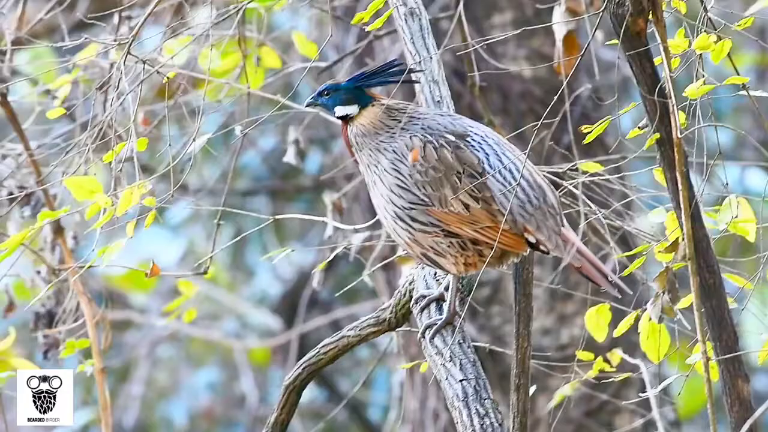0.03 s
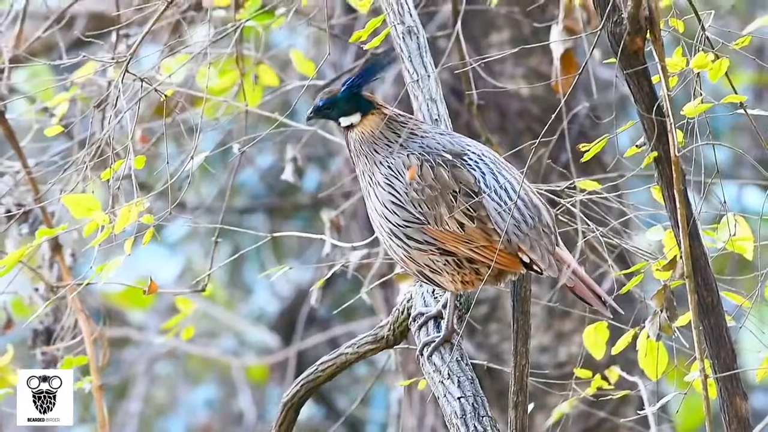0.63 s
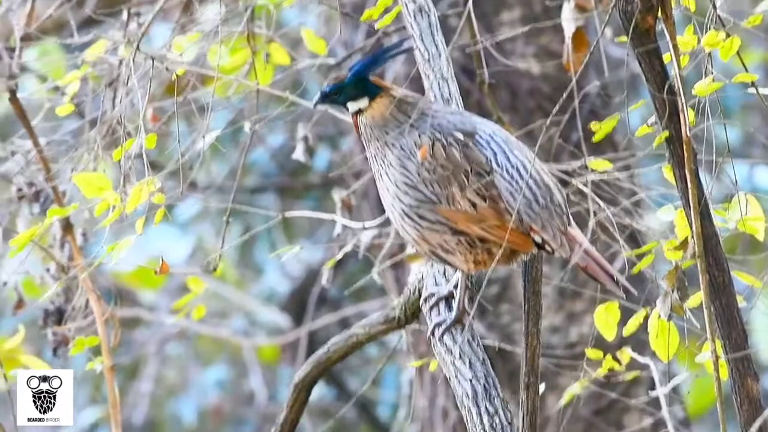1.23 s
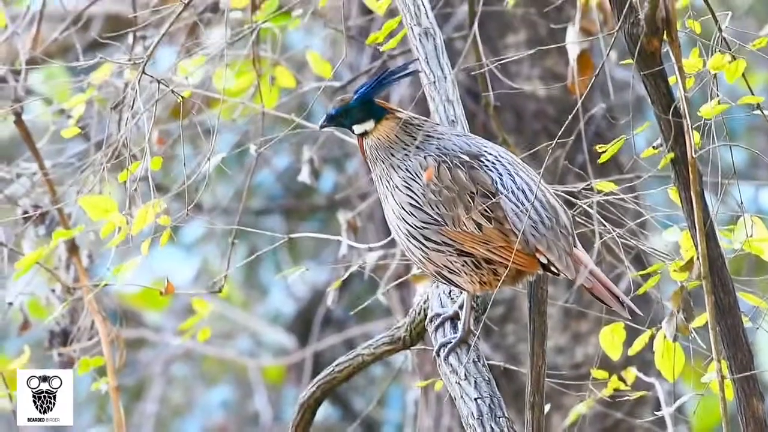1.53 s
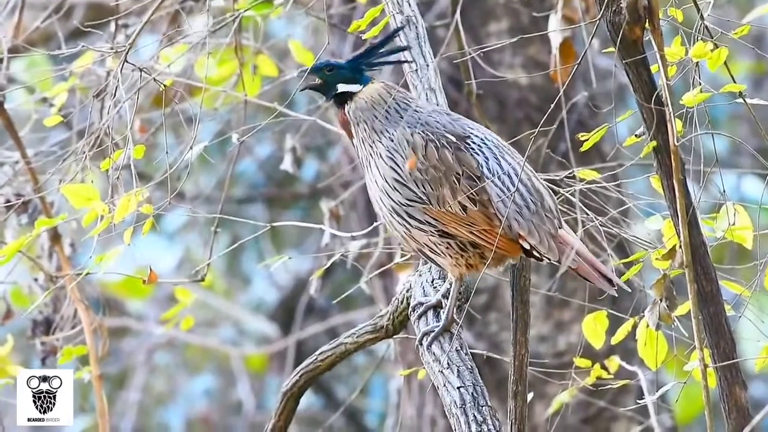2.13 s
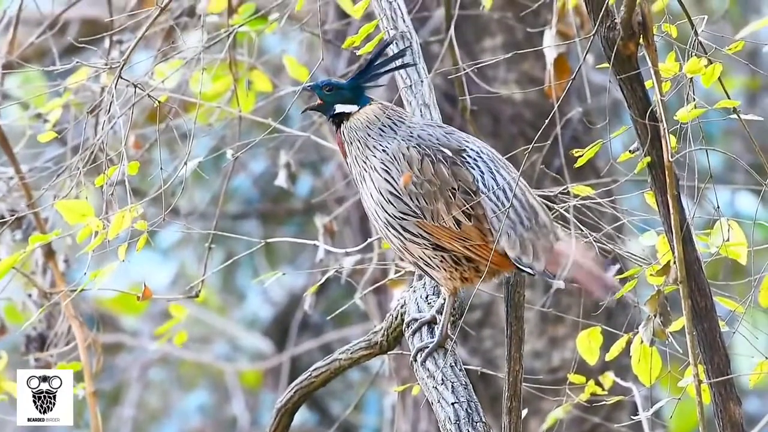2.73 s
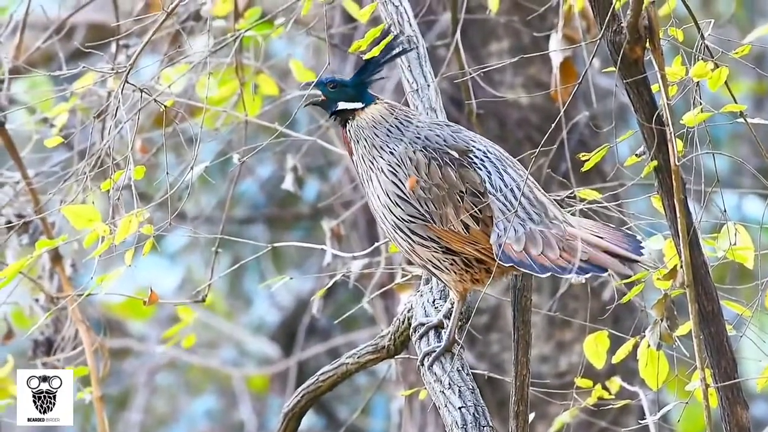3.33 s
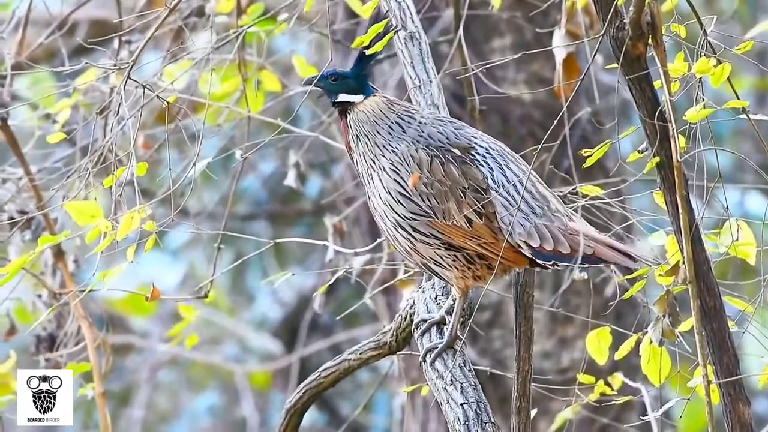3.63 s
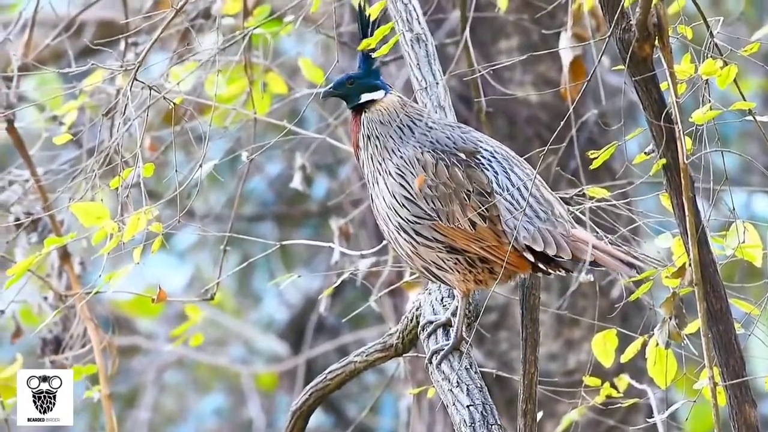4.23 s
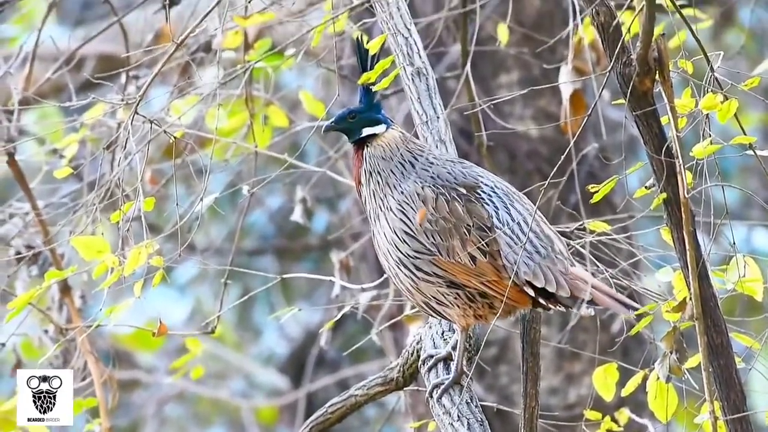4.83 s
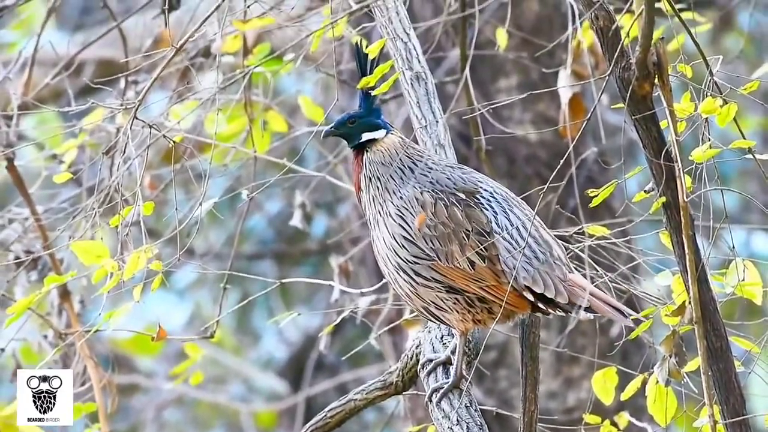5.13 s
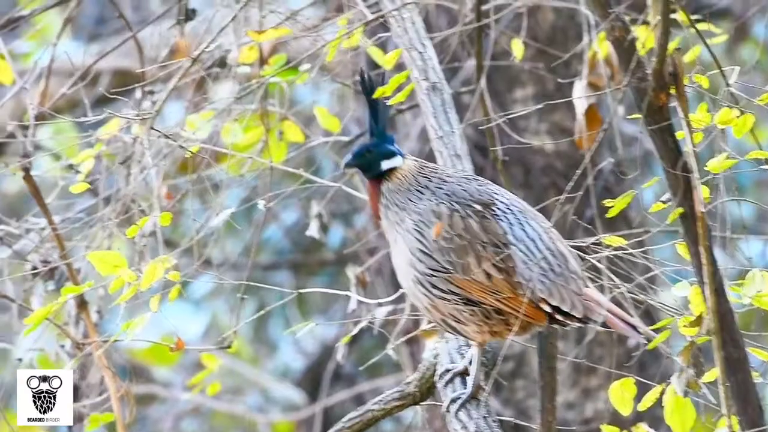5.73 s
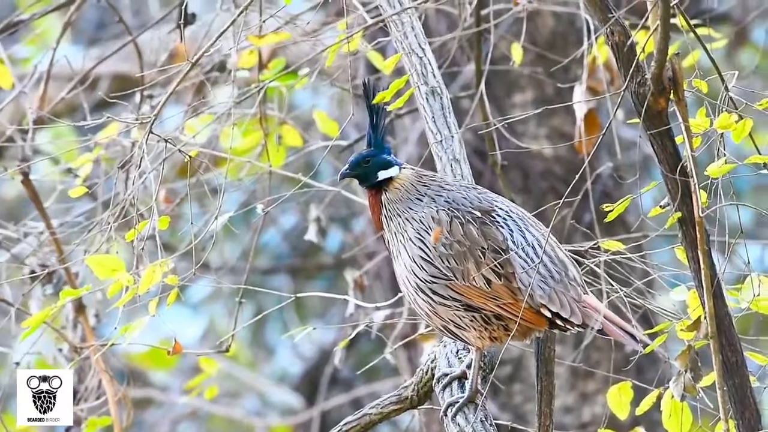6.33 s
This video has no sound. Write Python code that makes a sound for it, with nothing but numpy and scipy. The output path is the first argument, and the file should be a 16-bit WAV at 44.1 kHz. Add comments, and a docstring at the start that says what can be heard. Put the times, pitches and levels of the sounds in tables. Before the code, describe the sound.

In a forest, a nearby camera clicks five times, its focus motor whirring briefly after the first shot. A pheasant then crows loudly in five harsh syllables, a throaty rattle around a hoarse whistle, with a long, soft echo. Two more pairs of shutter clicks follow. Bird and camera sit almost entirely on the right, over quiet hiss and a low rumble.

```python
"""A pheasant on a forest branch crows five harsh syllables: an uneven throat rattle around a hoarse whistle.
Twigs scatter the calls and trunks return them as a long, soft echo. A nearby camera fires nine times,
each shot the same six strokes of mirror and curtains, and its focus motor whirrs once.
Quiet hiss and low rumble lie underneath. The microphone feeds the right channel and leaks
only faintly into the left."""
import sys
import numpy as np
from scipy import signal
from scipy.fft import rfft, irfft, next_fast_len
from scipy.io import wavfile
from scipy.ndimage import uniform_filter1d, map_coordinates

SR = 44100
rng = np.random.default_rng(int(sys.argv[2]) if len(sys.argv) > 2 else 0)


def store_pcm(level_fs):
    """Save levels as 16-bit WAV."""
    pcm = np.round(np.clip(level_fs, -1, 1) * 32767).astype(np.int16)
    wavfile.write(sys.argv[1], SR, np.atleast_2d(pcm).T)


N = 285768
SPIN_UP_S, SPIN_DOWN_S = 0.02, 0.052  # both camera motors start quickly and run out slowly


def amp(db):
    """Decibels to gain."""
    return 10 ** (np.asarray(db) / 20)


def unit(x):
    """Scale to rms 1."""
    return x / np.sqrt(np.mean(x ** 2) + 1e-20)


def along(points, hz):
    """Read a curve of (Hz, value) points on a log frequency axis."""
    point_hz, values = np.transpose(points)
    return np.interp(np.log(hz + 1), np.log(point_hz + 1), values)


def wobble(rate, size):
    """A smooth random curve with `rate` knots a second."""
    knots = rng.standard_normal(int(size * rate / SR) + 4)
    return map_coordinates(knots, [np.arange(size) * rate / SR])


def coloured(x, spectrum):
    """Minimum-phase EQ through (Hz, dB) points."""
    m = 2 * next_fast_len(len(x))
    cepstrum = irfft(np.log(amp(along(spectrum, np.fft.rfftfreq(m, 1 / SR)))))
    cepstrum[1:m // 2] *= 2
    cepstrum[m // 2 + 1:] = 0
    return irfft(rfft(x, m) * np.exp(rfft(cepstrum)))[:len(x)]


def resonance(x, centre_hz, width_hz):
    """One ringing mode with gain 1 at its centre."""
    return signal.lfilter(*signal.iirpeak(centre_hz, centre_hz / width_hz, SR), x)


def gate(t, length_s, attack_s, release_s):
    """Attack, hold and release between 0 and length_s."""
    return np.clip(t / attack_s, 0, 1) * np.clip((length_s - t) / release_s, 0, 1)


def add(track, start_s, sound):
    """Mix a sound into a track."""
    part = track[max(round(start_s * SR), 0):][:len(sound)]
    part += sound[:len(part)]


def noise(spectrum):
    """Steady coloured noise of rms 1."""
    return unit(coloured(rng.standard_normal(N), spectrum))


def noise_bed():
    """Each channel has its own quiet hiss; a low rumble sits on the left."""
    # hiss colour: freq_hz, gain_db
    hiss_eq = [(25, -6), (100, 0), (250, -1.5), (500, -4.5), (1000, -7), (2000, -11.5), (5000, -16.5),
               (10000, -21), (15500, -29)]
    # rumble colour: freq_hz, gain_db
    rumble_eq = [(15, -5), (30, -2.5), (80, 0), (130, -3.5), (200, -7), (400, -13.5), (800, -21.5),
                 (2000, -54.5)]
    left = amp(-59.5) * noise(hiss_eq) + amp(-51) * noise(rumble_eq)
    right = amp(-57) * noise(hiss_eq)
    return np.array([left, right])


def stroke(t, rise_s, t60_s, bounce_db, bounce_s=0.0095):
    """Envelope of a part that hits its stop at t = 0, rattles out and bounces once."""
    def hit(age):
        return np.clip(age / rise_s, 0, 1) * amp(-60 * np.maximum(age - rise_s, 0) / t60_s)
    return np.hypot(hit(t), amp(bounce_db) * hit(t - bounce_s))


def shutter():
    """Mirror and curtains knock the body and tick the blades; each release adds a ringing thump."""
    # shutter releases: release_s, level_db
    shots = [(0.2268, -31), (0.5604, -31), (0.894, -31), (1.227, -31), (1.776, -31), (3.7496, -31),
             (4.0839, -31.5), (5.3188, -31.5), (5.6545, -31)]
    # mirror up, curtain set, latch, release, second curtain, mirror down:
    # offset_s, knock_db, tick_db, bounce_db, rise_s
    strokes = [(-.102, -2, -2, -4.5, 0.0062), (-.0665, -2, -12, -5.5, 0.0021),
               (-.006, -6.5, -13, -10, 0.0022), (-.0005, 2, -4, -14, .0015), (0.023, -0.5, -7.5, -14, .002),
               (0.043, -1.5, -4.5, -5.5, .0025)]
    # camera body modes: centre_hz, width_hz, gain_db
    body_modes = [(1156, 115, 2.5), (1462, 183, 0.5), (2100, 240, -1), (2720, 180, -4.5), (2970, 210, -4.5),
                  (3790, 240, -4), (4390, 310, -9.5), (5090, 170, -6.5), (5750, 120, -20)]
    # colour of the metal blades: freq_hz, gain_db
    blade_eq = [(1000, -5), (3000, -3), (4000, -9.5), (6000, -1), (7000, -6), (8000, -10.5), (11000, -9),
                (13500, -12), (15500, -18)]
    # what the release sets ringing: pitch_hz, level_db, t60_s
    thump_modes = [(1276, 7, 0.014), (1950, -9, 0.0099), (3040, -1.5, 0.012)]
    knock_t60_s, tick_t60_s = 0.074, 0.019  # the thin blades die faster than the body
    t = np.arange(-SR // 5, SR // 5) / SR  # zero at the release
    knock_power = tick_power = 0
    for offset_s, knock_db, tick_db, bounce_db, rise_s in strokes:
        age = t - offset_s
        slide = amp(-14.5) * np.exp(-np.abs(age) / 0.0067)  # the part slides audibly into its hit
        knock_power += (amp(knock_db + 1.5) * stroke(age, rise_s, knock_t60_s, bounce_db)) ** 2
        tick_power += amp(tick_db - 1) ** 2 * (stroke(age, rise_s, tick_t60_s, bounce_db) ** 2 + slide ** 2)
    # the drive runs from just before the release until the mirror is back
    gears = amp(-18) * gate(t + 0.022, 0.079, SPIN_UP_S, SPIN_DOWN_S)
    tick_power += gears ** 2
    tail = t[t >= 0]
    ring = sum(amp(db - 60 * tail / t60) * np.sin(2 * np.pi * hz * tail) for hz, db, t60 in thump_modes)
    thump = ring * (1 - np.exp(-tail / 0.0011))
    knocks, ticks, thumps = np.zeros((3, N))
    for release_s, db in shots:
        add(knocks, release_s + t[0], amp(db) * np.sqrt(knock_power) * rng.standard_normal(len(t)))
        add(ticks, release_s + t[0], amp(db) * np.sqrt(tick_power) * rng.standard_normal(len(t)))
        add(thumps, release_s, amp(db) * thump)
    body = sum((-1) ** k * amp(db) * resonance(knocks, hz, width_hz)
               for k, (hz, width_hz, db) in enumerate(body_modes))
    return body + coloured(ticks, blade_eq) + thumps


def forest(x, near_db, near_t60_s, far_db):
    """Nearby twigs scatter the treble at once; distant trunks add a long, dull tail."""
    # decay among the trunks: freq_hz, t60_s
    trunk_decay = [(500, 1), (1400, 1.58), (2200, 1.5), (4000, 1.7), (8000, 1.32), (15000, 0.16)]
    # colour of the twig scatter: freq_hz, gain_db
    twig_eq = [(600, 0), (1600, -4.5), (4000, 6), (7000, 5), (10000, 5), (15000, 13)]
    hz, t, bands = signal.stft(rng.standard_normal(3 * SR // 2), SR, nperseg=256)
    decay = amp(-60 * t / along(trunk_decay, hz)[:, None])
    far = signal.istft(bands * decay * (1 - np.exp(-t / 0.0079)), SR, nperseg=256)[1]
    t = np.arange(SR // 2) / SR
    spikes = rng.standard_normal(len(t)) ** 3
    near = spikes * amp(-60 * t / near_t60_s) * (1 - np.exp(-t / 0.0035))
    echo = amp(far_db) * far / np.linalg.norm(far)
    add(echo, 0, amp(near_db) * coloured(near / np.linalg.norm(near), twig_eq))
    return x + signal.fftconvolve(x, echo)[:N]


def focus_motor(start_s=0.402, length_s=0.16):
    """The lens motor whirrs briefly before the second shot."""
    # whirr colour: freq_hz, gain_db
    motor_eq = [(600, -33), (1500, -2), (5000, -2), (8000, -6), (13000, -12), (15500, -15)]
    spin = gate(np.arange(N) / SR - start_s, length_s, SPIN_UP_S, SPIN_DOWN_S)
    return amp(-54.5) * spin * noise(motor_eq)


def syrinx(rate_hz, jitter, scatter_db, turbulence):
    """Membranes slap unevenly, each opening letting out a puff of air. Returns sound and airflow."""
    n = len(rate_hz)
    cycles = np.cumsum(rate_hz * np.exp(jitter * wobble(300, n))) / SR
    slaps = np.diff(np.floor(cycles), prepend=-1) * amp(scatter_db * rng.standard_normal(n))
    flow = 1 + 0.5 * np.cos(2 * np.pi * cycles - 1)  # swells just after each slap
    puffs = unit(flow * rng.standard_normal(n))
    return unit(unit(slaps) + turbulence * puffs), flow


def saturated(x, ceiling):
    """The swing of the membranes is limited, which evens out the strongest slaps."""
    swing = uniform_filter1d(np.abs(signal.hilbert(unit(x))), size=60)
    return unit(x / (1 + (swing / ceiling) ** 4) ** 0.25)


def whistle(centre_hz, swell_db, opening, flow, hz_per_db=3, hz_per_opening=168):
    """A hoarse tone that pulses with the airflow and rises with pressure and as the beak opens."""
    pitch_hz = centre_hz + hz_per_db * swell_db + hz_per_opening * (opening - opening.mean())
    hoarse_hz = pitch_hz * (1 + 0.037 * wobble(600, len(flow)))
    return unit(flow * np.sin(2 * np.pi * np.cumsum(hoarse_hz) / SR))


def windpipe(flow, centre_hz=4050, width_hz=400):
    """Breath excites the upper resonance of the windpipe: a nasal edge."""
    breath = flow * rng.standard_normal(len(flow))
    return unit(resonance(resonance(breath, centre_hz, width_hz), centre_hz, width_hz))


def syllable(length_s, full_db, swell_s, whistle_hz, whistle_db, first_opening, last_opening):
    """One push of air swells and eases. An open beak makes the rattle faster and brighter."""
    # throat colour, beak nearly shut: freq_hz, gain_db
    shut_eq = [(200, -37.5), (520, -22.5), (720, -15), (1000, -6.5), (1230, 2), (1550, 1), (1800, -10),
               (2400, -24.5), (3300, -27), (4000, -18.5), (4900, -29.5), (5600, -46), (8300, -45.5),
               (10200, -44.5), (13000, -51)]
    # throat colour, beak wide open: freq_hz, gain_db
    open_eq = [(250, -49.5), (500, -33.5), (690, -20.5), (850, -23), (1150, -17.5), (1500, 1), (1780, -0.5),
               (2050, -7), (2450, -22.5), (2800, -17), (3500, -21), (4000, -18.5), (4700, -24.5),
               (8300, -49.5), (14500, -84)]
    # turbulence of a forced call: freq_hz, gain_db
    rasp_eq = [(1500, -30), (2800, -2), (3500, -6), (4000, -2), (4900, -1.5), (5800, -6), (8300, -13.5),
               (10200, -24), (12000, -36), (14000, -33), (15500, -39)]
    t = np.arange(round(length_s * SR)) / SR
    swell_db = -11 * np.exp(-t / swell_s)
    ease_db = -11 * np.exp((t - length_s) / 0.022)
    level_db = full_db + swell_db + ease_db
    # the beak opens as the pressure swells
    opening = np.clip(np.linspace(first_opening, last_opening, len(t)) + 0.02 * swell_db, 0, 1)
    rattle, flow = syrinx(200 + 140 * opening, jitter=0.15, scatter_db=1, turbulence=0.6)
    muffled = np.sqrt(1 - opening ** 2) * amp(-6.5) * unit(coloured(rattle, shut_eq))
    bright = opening * unit(coloured(rattle, open_eq))
    tone = amp(whistle_db) * whistle(whistle_hz, swell_db, opening, flow)
    voiced = saturated(muffled + bright + tone, ceiling=1.6)
    effort = amp(0.43 * (level_db + 14.5))  # turbulence grows faster than loudness
    rasp = amp(-18) * effort * opening * unit(coloured(rattle + rng.standard_normal(len(t)), rasp_eq))
    nasal = amp(-20.5) * windpipe(flow)
    valve = gate(t, length_s, attack_s=0.0099, release_s=0.014)  # the syrinx snaps open and shuts
    return amp(level_db) * valve * (voiced + rasp + nasal)


def pheasant():
    """The bird turns its head between syllables, so each finds its own echoes."""
    # syllables of the crow (beak opening from 0, shut, to 1, wide):
    # start_s, length_s, full_db, swell_s, whistle_hz, whistle_db, first_opening, last_opening
    crow = [(2.002, .11, -21.5, .032, 1328, -7, 0.15, .16), (2.29, 0.18, -18.5, .026, 1455, -4.5, .66, .8),
            (2.795, 0.14, -16.5, 0.027, 1416, -5, 0.94, .98),
            (3.005, .195, -17.5, .016, 1460, -4.5, .92, .95),
            (3.293, 0.23, -19, 0.018, 1425, -3.5, 0.87, 0.25)]
    voice = np.zeros(N)
    for start_s, *shape in crow:
        call = np.zeros(N)
        add(call, start_s, syllable(*shape))
        voice += forest(call, near_db=-6.5, near_t60_s=0.5, far_db=-18.5)
    return voice


def scene():
    """Bird and camera sit far right, over the noise bed."""
    bird = pheasant()
    camera = forest(shutter() + focus_motor(), near_db=-16, near_t60_s=0.44, far_db=-27)
    microphone = bird + camera
    leak = amp(-23.5) * microphone
    return np.array([leak, microphone]) + noise_bed()


def record(dry, start_s=0.108, top_hz=15750):
    """The recorder opens after a moment of silence and keeps nothing above its band limit."""
    m = next_fast_len(N + SR // 2)
    fade_in = np.clip((np.arange(N) / SR - start_s) / 0.0018, 0, 1)
    passband = np.fft.rfftfreq(m, 1 / SR) < top_hz
    return irfft(rfft(dry * fade_in, m) * passband, m)[:, :N]


dry = scene()
out = record(dry)
store_pcm(out)
```